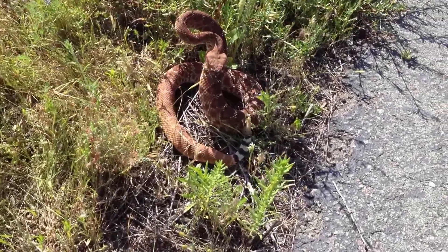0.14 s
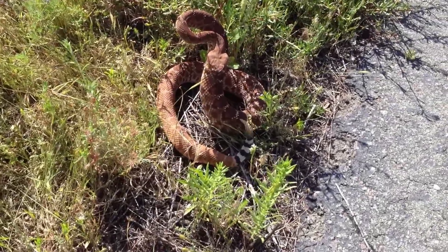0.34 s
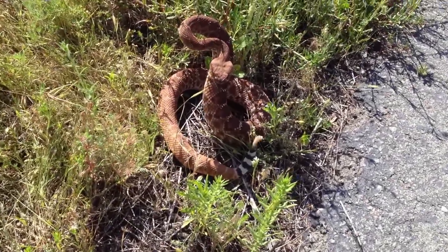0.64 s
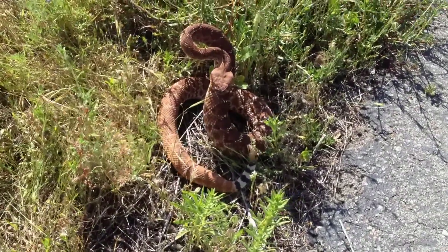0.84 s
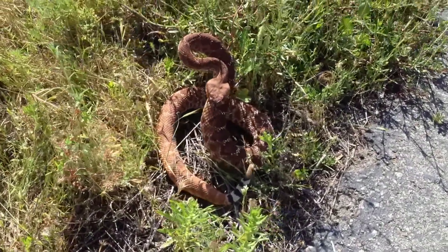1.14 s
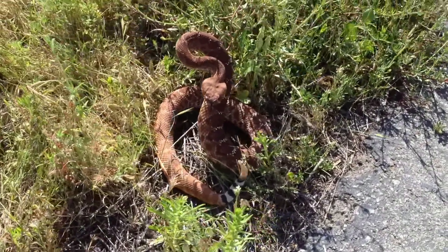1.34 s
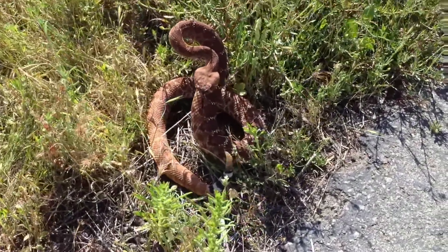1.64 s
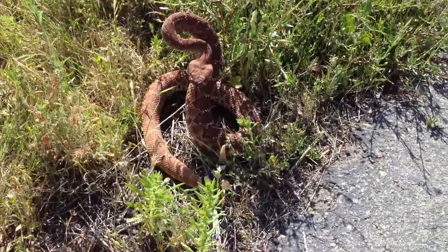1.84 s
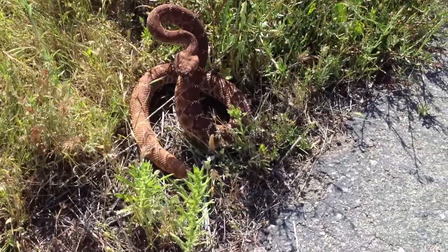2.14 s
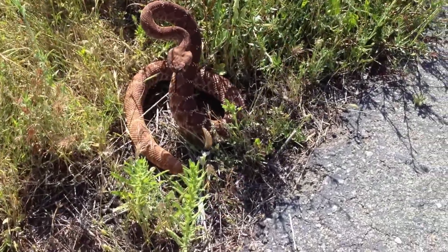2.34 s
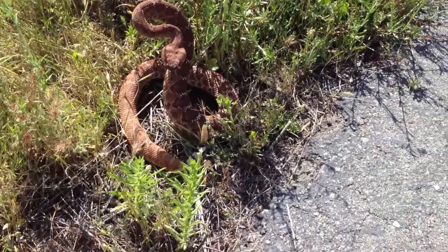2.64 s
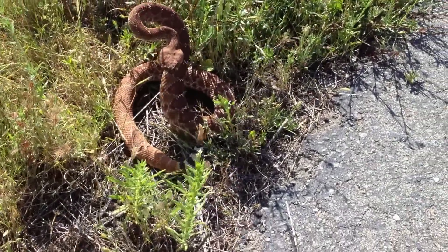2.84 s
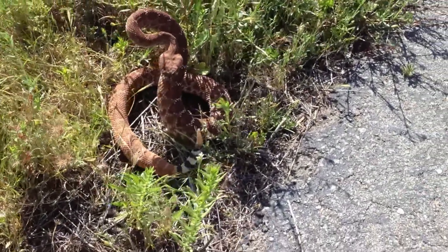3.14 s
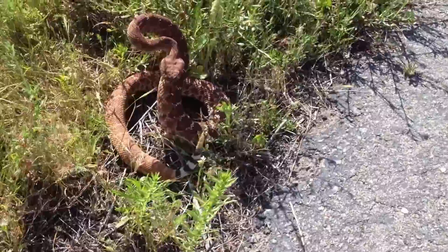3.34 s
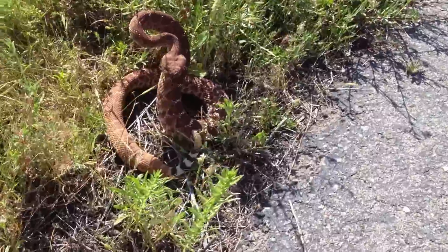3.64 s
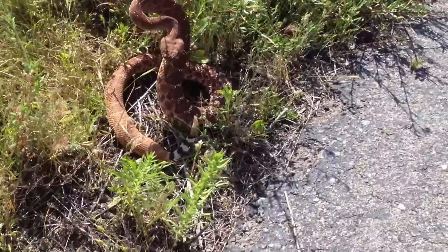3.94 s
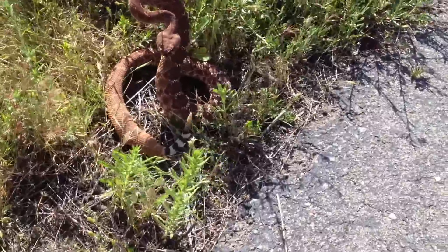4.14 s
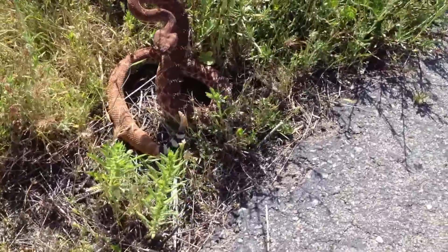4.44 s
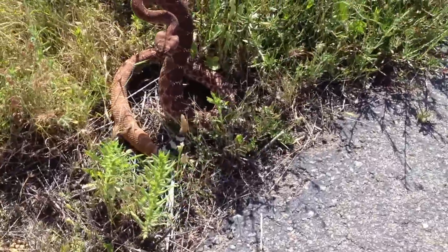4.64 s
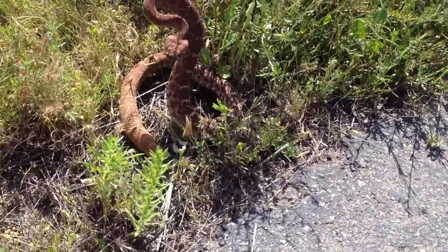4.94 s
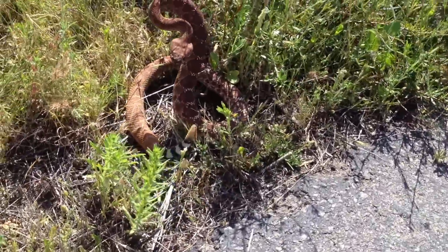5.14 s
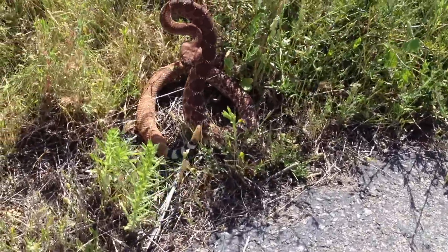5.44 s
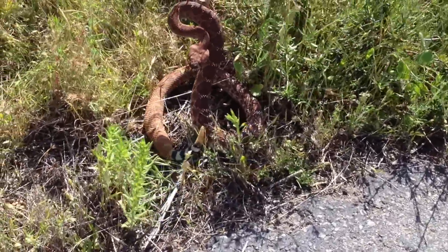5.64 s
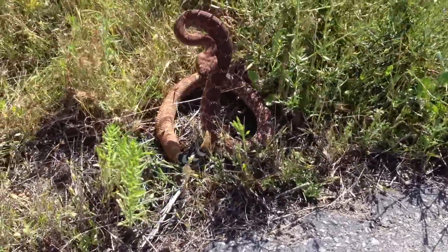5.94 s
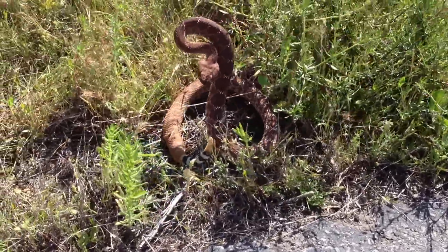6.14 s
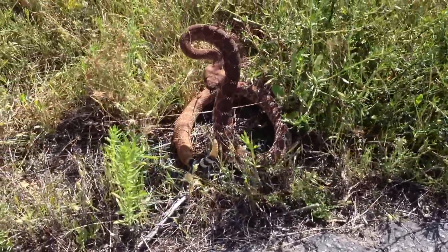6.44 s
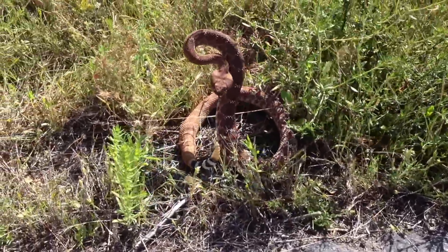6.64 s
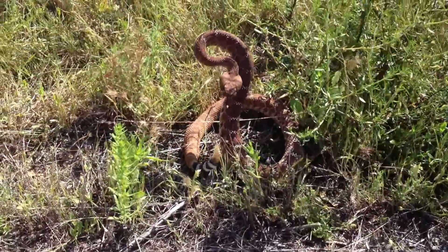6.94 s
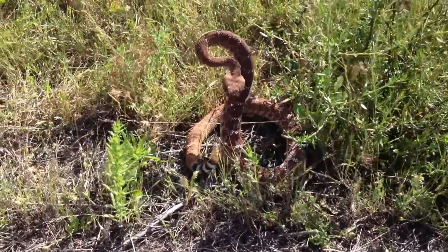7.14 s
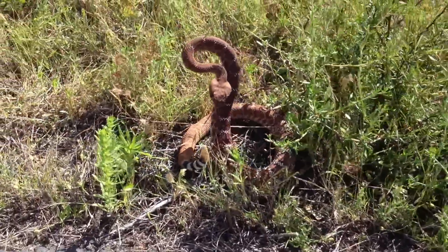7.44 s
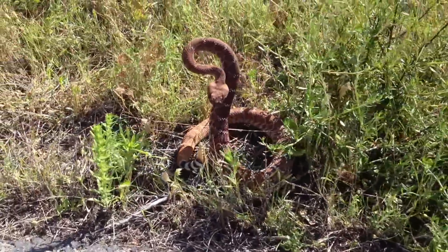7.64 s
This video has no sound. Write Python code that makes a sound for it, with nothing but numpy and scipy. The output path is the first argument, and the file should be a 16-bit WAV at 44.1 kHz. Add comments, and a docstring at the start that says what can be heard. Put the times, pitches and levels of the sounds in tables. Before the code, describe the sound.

Crisp single shakes of a snake's hollow rattle come roughly every seventh to seventeenth of a second, then run together into a fluttering, hissy shake of over twenty pulses a second. It dips and surges before settling into a steady sizzling buzz. The mono pickup is close and dry in open air, with light gusts bumping the microphone, small ticks, and a barely audible distant whine.

```python
"""Single flicks of a rattlesnake's tail come first, close up, over faint open air and light wind.
They run into a pulsing shake, then a steady buzz: tiny contacts, bunched in knocks, excite resonances.
Gusts are swelling coloured noise; eddies thump on the microphone as short wavering low tones.
Dry scuffs are bursts of uneven noise, casing knocks are decaying modes, far whines are narrow noise."""
import sys
import numpy as np
from scipy import signal
from scipy.fft import rfft, irfft
from scipy.io import wavfile
from scipy.ndimage import uniform_filter1d

SR = 44100
rng = np.random.default_rng(int(sys.argv[2]) if len(sys.argv) > 2 else 0)


def master_out(mix):
    """Clip the mix to full scale and print it as 16-bit PCM to the path in sys.argv[1]."""
    frames = np.transpose(np.atleast_2d(mix))
    ceiling = np.clip(frames, -1, 1)
    pcm = np.round(ceiling * 32767).astype(np.int16)
    wavfile.write(sys.argv[1], SR, pcm)


N = 344421
TIME = np.arange(N) / SR
EDGE_HZ = 15480  # upper band limit

# single tail flicks: t/s, force at top/dB, half length/s, force of the segments settling after it/dB
TAIL_FLICKS = [(0.044, -30, 0.003, -40), (0.146, -30.5, 0.0024, -40.5), (0.251, -34.5, 0.0044, -49.5),
               (0.319, -41, 0.0053, -47.5), (0.378, -32, 0.0031, -42), (0.436, -31.8, 0.005, -41),
               (0.488, -36.5, 0.0013, -53), (0.54, -35.5, 0.0058, -41.5), (0.594, -31, 0.0038, -41),
               (0.656, -33, 0.0028, -46.5), (0.714, -41.5, 0.01, -51), (0.777, -34.5, 0.0029, -49),
               (0.836, -34.5, 0.0059, -49.5)]
# stroke rate of the shake: t/s, rate/(strokes/s)
STROKE_RATE = [(0.908, 18.74), (1.2, 20.55), (1.5, 22.45), (2.33, 23.72), (2.72, 21.27), (3.11, 19.82),
               (3.38, 23.63), (3.86, 23.13), (4.0, 24.64), (4.22, 20.52), (4.27, 24.26), (4.96, 21.75),
               (5.07, 23.81), (5.6, 22.11), (6.05, 23.29)]
# effort of the shake: t/s, level at top of stroke/dB, dip between strokes/dB
SHAKE_EFFORT = [(0.91, -35, 24), (1.22, -30, 14.5), (1.26, -32.5, 19.1), (1.56, -26.5, 11.6),
                (2.09, -26, 11), (2.49, -29, 16.5), (3.09, -35, 18), (3.39, -30, 20.5), (3.64, -29.5, 12),
                (4.19, -30, 15.5), (4.5, -26.6, 11.5), (5.46, -27.5, 11), (5.88, -26, 8.5),
                (6.05, -26.5, 0.1)]
# one stroke, quick swing then slower settling: share of stroke/1, share of dip/1
STROKE_SHAPE = [(0, 1), (.07, .88), (.19, .15), (.3, 0), (.42, .04), (.62, .35), (.85, .85), (1, 1)]
# tail hangs still for an instant: t/s, extra dip/dB
TAIL_STALLS = [(1.712, 3.5), (2.187, 4.5), (2.483, 12), (2.618, 1), (3.197, 6), (3.85, 4), (4.191, 17)]
# steady buzz: t/s, level/dB
BUZZ_LEVEL = [(6.05, -26), (6.182, -27), (6.598, -25.5), (7.81, -26.5)]
# segments knocking on each other: t/s, rate/(knocks/s), timing spread/interval, share of power in knocks/1
SEGMENT_KNOCKS = [(0, 143, 0.3, 0.73), (1.5, 139, 0.19, 0.54), (5.8, 151, 0.21, 0.47),
                  (6.12, 170, .15, 0.29), (6.4, 166, .08, 0.58), (6.67, 184, 0.067, 0.52),
                  (7.03, 174, 0.05, 0.62), (7.39, 160, 0.035, 0.65), (7.8, 170, 0.062, 0.58)]
# sharper snaps of the rattle: t/s, peak force/dB
RATTLE_SNAPS = [(0.914, -33), (1.176, -27), (1.276, -30), (2.418, -30), (1.684, -30), (3.39, -28),
                (4.074, -25), (4.204, -28), (4.392, -19), (4.724, -23), (5.17, -28), (6.588, -27),
                (7.504, -26)]
# colour of the hollow segments: f/Hz, relative density/dB per Hz
SEGMENT_COLOUR = [(500, -62), (1500, -30.5), (2300, -21), (2900, -12.5), (3550, -9), (4250, -9),
                  (5500, -2.5), (7200, 0.6), (8800, -1.5), (10500, -4), (12400, -4), (13300, -2.5),
                  (14700, -3.5), (15400, -11)]
# three shifting resonances: t/s, low f/Hz, boost/dB, middle f/Hz, boost/dB, high f/Hz, boost/dB
SEGMENT_RINGS = [(.6, 4930, 7.5, 6440, -0.5, 6860, -0.8), (2, 4900, 1.5, 6360, 2.5, 7900, 5),
                 (3.5, 4620, 4.5, 6000, -1, 7500, -1), (4.6, 4700, 1.5, 6250, 2.5, 7900, 3.5),
                 (5.4, 3850, 3, 6250, 3, 8000, 4), (6.3, 4640, 2.5, 6150, 5.5, 8050, 3),
                 (7.2, 5760, 0, 6250, 3.5, 8000, 0.5)]
# gusts: t/s, level at peak/dB, half length to 1/e power/s
WIND_GUSTS = [(.48, -54, 0.045), (1.465, -54, .08), (2.08, -52, 0.13), (2.692, -44, .19), (3.445, -46, .12),
              (4.044, -54.5, 0.13), (4.523, -50, 0.033), (5.016, -46.5, 0.15), (5.723, -44, 0.14),
              (6.188, -47.5, 0.23)]
# eddies on the microphone: t/s, level at peak/dB, mean f/Hz, half length before stretch/s
EDDY_THUMPS = [(1.448, -27.5, 173.5, 0.013), (1.961, -39.5, 147, 0.0041), (2.497, -37.5, 159.6, 0.01),
               (2.573, -33, 170, 0.004), (2.75, -27.5, 202, 0.014), (2.801, -28, 239, 0.0019),
               (2.841, -32.5, 190, 0.0094), (2.88, -31, 169, 0.0034), (3.351, -28.5, 174.3, 0.0084),
               (3.435, -33.5, 166, 0.0039), (3.54, -32, 219, 0.0016), (3.583, -35, 256, 0.0014),
               (4.001, -34.5, 189, 0.0034), (5.057, -32, 219, 0.0034), (5.139, -29, 190, 0.0049),
               (5.615, -29, 176.3, 0.007), (5.638, -31, 183, 0.0047), (5.684, -25, 191.5, 0.0078),
               (5.744, -20.5, 215, 0.0061), (5.771, -24, 203.4, 0.009), (6.295, -26.5, 214.5, 0.0027),
               (6.306, -24, 193.6, 0.0036), (6.859, -39.5, 166.3, 0.0068)]
# wind rumble: f/Hz, relative density/dB per Hz
RUMBLE_COLOUR = [(25, -5.5), (45, -15), (65, -19), (90, -3), (165, 3.5), (240, -3.5), (340, -8.5),
                 (480, -17), (700, -26), (1500, -34)]
# rougher edge of an eddy: f/Hz, relative density/dB per Hz
BUFFET_COLOUR = [(50, -26), (100, 0), (160, 3), (300, 2), (400, -7), (520, -20), (800, -36), (2000, -62)]
# dry scuffs and ticks: t/s, level/dB, centre f/Hz, half length/s
DRY_SCUFFS = [(0.217, -48, 970, 0.0026), (0.256, -45, 1317, 0.0017), (0.866, -37, 950, 0.0015),
              (1.145, -42, 1680, 0.0013), (1.388, -51.5, 1500, 0.048), (1.549, -42, 1730, 0.0015),
              (1.804, -49.5, 1260, 0.0083), (2.633, -27.5, 2040, 0.00069), (2.654, -44.5, 2021, 0.0063),
              (3.86, -50.5, 1700, 0.016), (4.376, -49, 850, 0.007), (4.858, -45.5, 1606, 0.0015),
              (5.315, -44.5, 1320, 0.0076), (5.394, -42.5, 1350, 0.015), (6.302, -24.5, 1740, 0.00081),
              (6.31, -38, 1250, 0.0023), (7.204, -49, 1520, 0.014), (7.231, -36, 1988, 0.0014),
              (7.32, -44, 1220, 0.002), (7.343, -41, 1981, 0.0019)]
# colour shared by all scuffs: f/Hz, gain/dB
SCUFF_COLOUR = [(300, -1), (700, 2.5), (1080, 2), (1650, -3.5), (2400, 2.5), (3200, -2), (6000, -6)]
# knocks on the microphone casing: t/s, drive level/dB
CASING_KNOCKS = [(.867, -59), (2.634, -44), (4.374, -35), (4.383, -40), (5.315, -41), (6.302, -32),
                 (6.309, -33)]
# casing modes: f/Hz, relative level/dB, t60/s
CASING_MODES = [(345, -10, 0.051), (564, 7, 0.032), (800, 3, 0.031), (960, 2.5, 0.033), (1440, -6, 0.021),
                (1700, -2, 0.03), (2340, -4, .02)]
# open air: f/Hz, relative density/dB per Hz
AIR_COLOUR = [(200, -3), (450, 2.5), (620, -5.5), (780, -1.5), (950, -1), (1090, -1.5), (1220, -1),
              (1370, -1.5), (1650, -3.5), (3000, -6.5), (8000, -6.5), (15500, -6)]
# open air: t/s, mean level/dB
AIR_LEVEL_CURVE = [(0, -63), (1, -57.5), (2.9, -63.5), (3.1, -52), (3.35, -58), (4.2, -55.5), (6.4, -57.5),
                   (6.9, -52)]
# far whines and whirs: start/s, end/s, centre f/Hz, width/Hz, level/dB
FAR_WHINES = [(1.9, 7, 1087, 22, -75.5), (3, 3.25, 1340, 350, -65), (6.6, 8.7, 1370, 278, -64)]


def gain_of(db):
    """Amplitude ratio of a level in dB."""
    return 10 ** (np.asarray(db) / 20)


def evened(x):
    """Scales to rms 1."""
    return x / np.sqrt(np.mean(x ** 2) + 1e-20)


def follow(rows, t_s=TIME):
    """Interpolates the columns of a curve at the times t_s."""
    row_s, *columns = np.transpose(rows)
    return [np.interp(t_s, row_s, column) for column in columns]


def read(points, hz):
    """Spectrum in dB at hz, interpolated on log frequency."""
    point_hz, db = np.transpose(points)
    return np.interp(np.log(hz + 1), np.log(point_hz + 1), db)


def hiss(spectrum):
    """Noise of a given colour, rms 1."""
    hz = np.fft.rfftfreq(N, 1 / SR)
    bins = rfft(rng.standard_normal(N)) * gain_of(read(spectrum, hz))
    return evened(irfft(bins, N))


def wander(hz):
    """Chance drift: noise under a Gaussian low-pass of width hz, rms 1."""
    low_pass = np.exp(-(np.fft.rfftfreq(N, 1 / SR) / hz) ** 2)
    return evened(irfft(rfft(rng.standard_normal(N)) * low_pass, N))


def add(mix, centre_s, sound):
    """Adds a sound to the mix, centred on centre_s."""
    start = round(centre_s * SR) - len(sound) // 2
    sound = sound[max(-start, 0):]
    part = mix[max(start, 0):][:len(sound)]
    part += sound[:len(part)]


def rattle(ticks_per_s=9000, spread_db=1.5, blur=0.36, snap_s=0.00059):
    """Tiny contacts, driven by tail motion and bunched in knocks, ring the hollow segments."""
    ticks = rng.choice([-1, 1], N) * (rng.random(N) < ticks_per_s / SR)
    ticks = ticks * gain_of(spread_db * np.minimum(rng.exponential(1, N), 3))
    # grass and ground scatter part of the ticks into a hiss
    contacts = np.sqrt(1 - blur) * evened(ticks) + np.sqrt(blur) * rng.standard_normal(N)
    force = tail_motion() * knocks()
    for s, db in RATTLE_SNAPS:
        force += gain_of(db) * np.exp(-abs(TIME - s) / snap_s)
    return segment_colour(contacts * force)


def segment_colour(source, patchy_db=0.95, sway=0.013, ring_width_hz=240):
    """Colours the contacts by the segments' spectrum, with patchy shifts and three swaying resonances."""
    hz, t_s, bins = signal.stft(source, SR, nperseg=512, noverlap=384)
    patches = uniform_filter1d(rng.standard_normal(bins.shape), size=4, axis=0)
    patches = uniform_filter1d(patches, size=16, axis=1)
    colour_db = read(SEGMENT_COLOUR, hz)[:, None] + patchy_db * evened(patches)
    rings = follow(SEGMENT_RINGS, t_s)
    for ring_hz, ring_db in zip(rings[::2], rings[1::2]):
        ring_hz = ring_hz * (1 + sway * np.interp(t_s, TIME, wander(hz=14)))
        offset = (hz[:, None] - ring_hz) / ring_width_hz
        colour_db = colour_db + ring_db * np.exp(-.5 * offset ** 2)
    colour = gain_of(colour_db)
    # equal mean power in every frame: colour leaves the level alone
    colour /= np.sqrt(np.mean(colour[hz < EDGE_HZ] ** 2, axis=0) * EDGE_HZ / hz[-1])
    return signal.istft(bins * colour, SR, nperseg=512, noverlap=384)[1][:N]


def tail_motion(settle_s=0.028, edge=2.2, lead=1.34, handover_s=.012):
    """Force on the rattle: flicks, then strokes, then an even buzz, summed as power."""
    flicks = np.zeros(N)
    u_s = np.arange(-SR // 8, SR // 8) / SR
    for s, db, half_s, settle_db in TAIL_FLICKS:
        rise = abs(u_s / (lead * half_s)) ** edge
        fall = .5 * (u_s / half_s) ** 2
        swing = np.exp(-np.where(u_s < 0, rise, fall))
        settling = (u_s > 0) * np.exp(-(u_s / settle_s) ** 2)
        add(flicks, s, gain_of(db) ** 2 * swing + gain_of(settle_db) ** 2 * settling)
    buzzing = .5 + .5 * np.tanh((TIME - BUZZ_LEVEL[0][0]) / handover_s)
    buzz = buzzing * gain_of(follow(BUZZ_LEVEL)[0]) ** 2
    return np.sqrt(flicks + (1 - buzzing) * strokes() ** 2 + buzz)


def strokes(stall_s=0.0092, uneven_db=0.73, brisk_per_s=21.74, slap_db=1.04, slap_at=.3, slap_width=0.096):
    """Pulsing shake: rate times the strokes, effort sets their height, slow strokes slap the segments."""
    rate_per_s, = follow(STROKE_RATE)
    top_db, dip_db = follow(SHAKE_EFFORT)
    shaking = TIME >= STROKE_RATE[0][0]
    phase = np.cumsum(rate_per_s * shaking) / SR % 1
    level_db = top_db - np.maximum(dip_db, 0) * follow(STROKE_SHAPE, phase)[0]
    level_db += uneven_db * wander(hz=13)
    # slap_db is per stroke/s below brisk; place and width are shares of the stroke
    slowness_per_s = np.maximum(brisk_per_s - rate_per_s, 0)
    level_db += slap_db * slowness_per_s * np.exp(-((phase - slap_at) / slap_width) ** 2)
    for s, db in TAIL_STALLS:
        level_db -= db * np.exp(-((TIME - s) / stall_s) ** 2)
    return shaking * gain_of(level_db)


def knocks(clatter_s=0.0022, spread_db=1.0):
    """Segments collide at uneven intervals; each clatter's power decays within milliseconds."""
    rate_per_s, uneven, share = follow(SEGMENT_KNOCKS)
    at = np.flatnonzero(np.diff(np.floor(np.cumsum(rate_per_s) / SR)))
    late, force = rng.standard_normal((len(at), 2)).T
    interval = SR / rate_per_s[at]  # samples
    moved = np.clip(at + late * uneven[at] * interval, 0, N - 1).astype(int)
    blows = np.bincount(moved, gain_of(spread_db * force) ** 2 * interval, N)
    keep = np.exp(-1 / (clatter_s * SR))
    power = signal.lfilter([1 - keep], [1, -keep], blows)
    share = np.clip(share, 0, 1)
    power = 1 - share + share * power / power.mean()
    # divide by the 900-sample mean: knocks redistribute energy only
    return np.sqrt(power / uniform_filter1d(power, size=900))


def wind(breeze_db=-54.5, fall_db_per_s=0.15, lumps_db=2.5, small_db=-3.5):
    """Lumpy rumble of a slowly dying breeze, swelling in gusts with small eddies, plus thumps."""
    breeze = gain_of(breeze_db - fall_db_per_s * TIME) ** 2
    gusting = np.zeros(N)
    for s, db, half_s in WIND_GUSTS:
        gusting += gain_of(db) ** 2 * np.exp(-((TIME - s) / half_s) ** 2)
    rumble = hiss(RUMBLE_COLOUR) * np.sqrt(breeze + gusting) * gain_of(lumps_db * wander(hz=28.2))
    return rumble + gain_of(small_db) * np.sqrt(gusting) * small_eddies() + thumps()


def thumps(edge_db=-11.0, stretch=0.9, waver=0.13):
    """Single eddies push the microphone for a few uneven cycles, with a rougher noise edge."""
    tones, eddies = np.zeros(N), np.zeros(N)
    u_s = np.arange(-SR // 16, SR // 16) / SR
    drift = wander(hz=115)
    for s, db, hz, half_s in EDDY_THUMPS:
        local_drift = drift[round(s * SR):][:len(u_s)]
        turns = rng.random() + np.cumsum(hz * (1 + waver * local_drift)) / SR
        push = gain_of(db) * np.exp(-.5 * (u_s / (half_s * stretch)) ** 2)
        add(tones, s, push * np.sqrt(2) * np.sin(2 * np.pi * turns))
        add(eddies, s, push)
    return tones + gain_of(edge_db) * eddies * hiss(BUFFET_COLOUR)


def small_eddies(per_s=22, centre_hz=160, half_s=0.0037, spread_db=4.5):
    """Short low-pitched puffs that arrive by chance, rms 1."""
    u_s = np.arange(-SR // 32, SR // 32) / SR
    puff = np.exp(-.5 * (u_s / half_s) ** 2) * np.sin(2 * np.pi * centre_hz * u_s)
    arrivals = (rng.random(N) < per_s / SR) * gain_of(spread_db * rng.uniform(-1, 1, N))
    return evened(signal.oaconvolve(arrivals, puff, "same"))


def scuffs(width_octaves=0.85, after_db=-13.5, trail=5.4, grit_db=4.5):
    """Short dry crunches of uneven grit noise; a longer one trails off for longer."""
    out = np.zeros(N)
    u_s = np.arange(-SR // 16, SR // 16) / SR
    hz = np.fft.rfftfreq(len(u_s), 1 / SR)
    grit = rng.standard_normal(N) * gain_of(grit_db * wander(hz=453))
    for s, db, centre_hz, half_s in DRY_SCUFFS:
        tail = (u_s > 0) * np.exp(-abs(u_s) / (trail * half_s))
        shape = np.exp(-.5 * (u_s / half_s) ** 2) + gain_of(after_db) * tail
        octaves = np.log2((hz + 1) / centre_hz)
        colour = np.exp(-.5 * (octaves / width_octaves) ** 2) * gain_of(read(SCUFF_COLOUR, hz))
        crunch = irfft(rfft(shape * grit[round(s * SR):][:len(u_s)]) * colour, len(u_s))
        # energy set by the envelope, whatever the colour
        add(out, s, gain_of(db) * crunch * np.linalg.norm(shape) / np.linalg.norm(crunch))
    return out


def bumps(rise_s=0.00032):
    """The hand shifts on the casing, whose damped modes ring briefly."""
    out = np.zeros(N)
    u_s = np.maximum(np.arange(-SR // 16, SR // 16) / SR, 0)
    for s, db in CASING_KNOCKS:
        ring = np.zeros(len(u_s))
        for hz, mode_db, t60_s in CASING_MODES:
            turns = hz * u_s + rng.random() / (2 * np.pi)  # start phase 0 to 1 rad
            ring += gain_of(mode_db - 60 * u_s / t60_s) * np.sin(2 * np.pi * turns)
        add(out, s, gain_of(db) * .5 * ring * (1 - np.exp(-u_s / rise_s)))
    return out


def air(swell_db=2.5):
    """Faint wash of the open country: coloured noise with a drifting level."""
    return hiss(AIR_COLOUR) * gain_of(follow(AIR_LEVEL_CURVE)[0] + swell_db * wander(hz=12.0))


def whines():
    """Thin wavering distant tones: narrow noise bands on a carrier, faded in and out."""
    out = np.zeros(N)
    for start_s, end_s, hz, width_hz, db in FAR_WHINES:
        fade_s = [start_s - .05, start_s + .05, end_s - .05, end_s + .05]
        fade = np.interp(TIME, fade_s, [0, 1, 1, 0])
        angle = 2 * np.pi * hz * TIME
        tone = wander(width_hz / 2) * np.cos(angle) + wander(width_hz / 2) * np.sin(angle)
        out += gain_of(db) * fade * tone
    return out


def scene():
    """Snake, wind and small sounds summed at one microphone."""
    return (rattle() + wind() + scuffs() + bumps() + air() + whines())[None]


def record(dry, low_cut_hz=62):
    """Microphone wind filter (zero phase, 18 dB/octave), then the recorder's band limit."""
    hz = np.fft.rfftfreq(N, 1 / SR)
    thinned = irfft(rfft(dry) / np.sqrt(1 + (low_cut_hz / (hz + 1)) ** 6), N)
    band_limit = signal.firwin(511, EDGE_HZ, window=("kaiser", 8), fs=SR)
    return signal.oaconvolve(thinned, band_limit[None], "same")


dry = scene()
out = record(dry)
master_out(out)
```